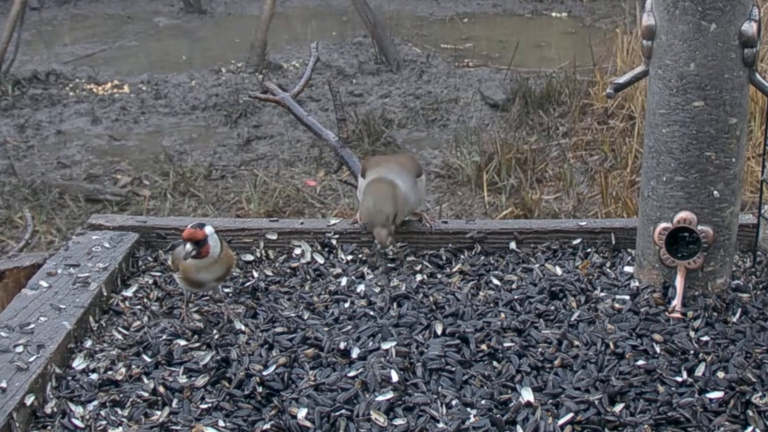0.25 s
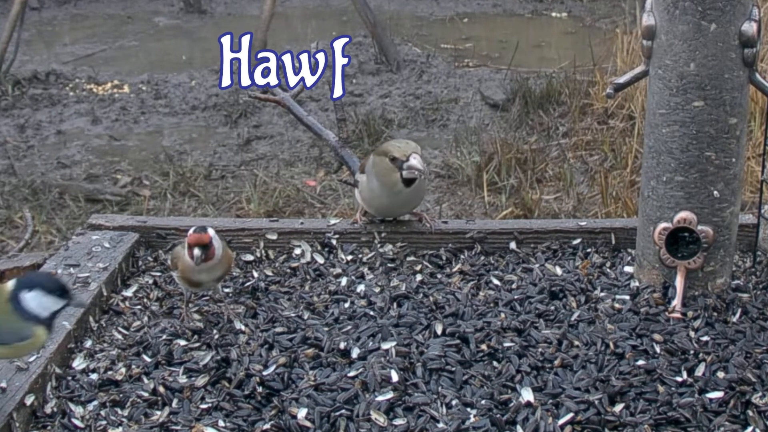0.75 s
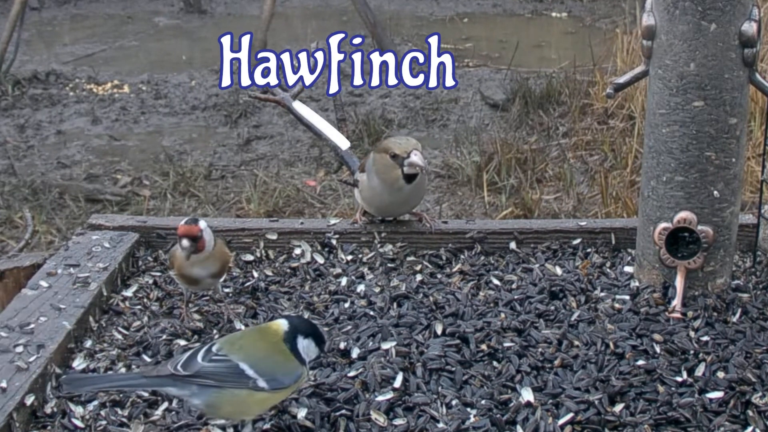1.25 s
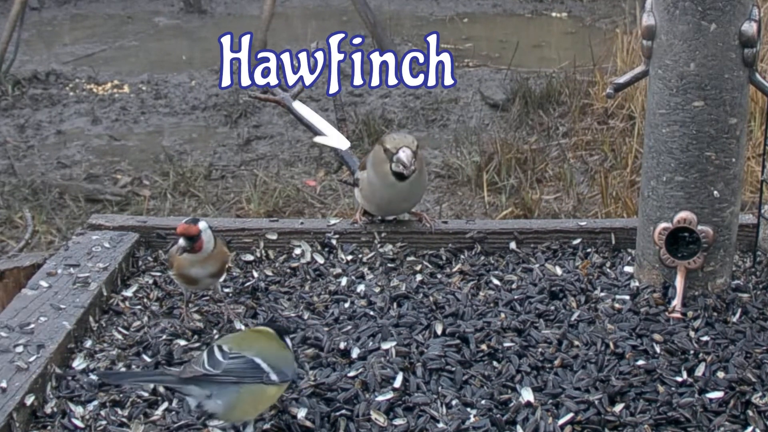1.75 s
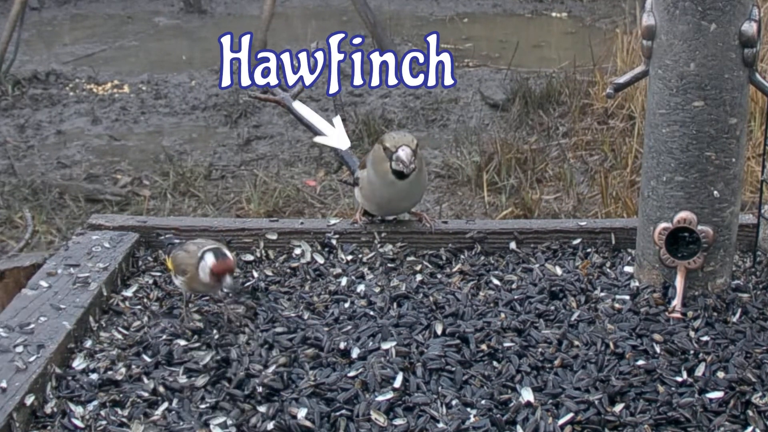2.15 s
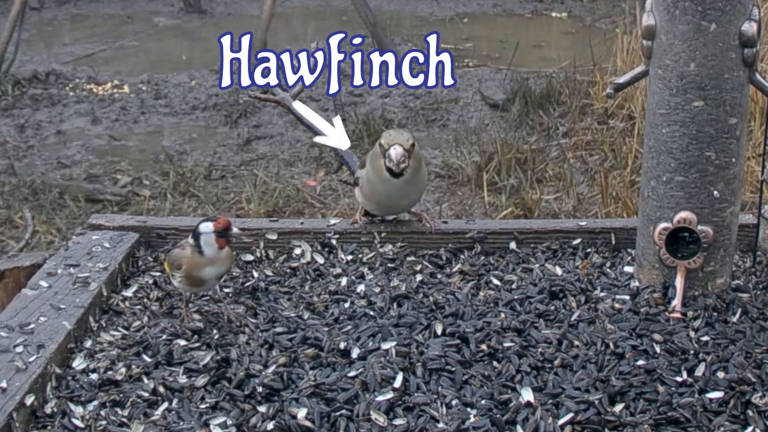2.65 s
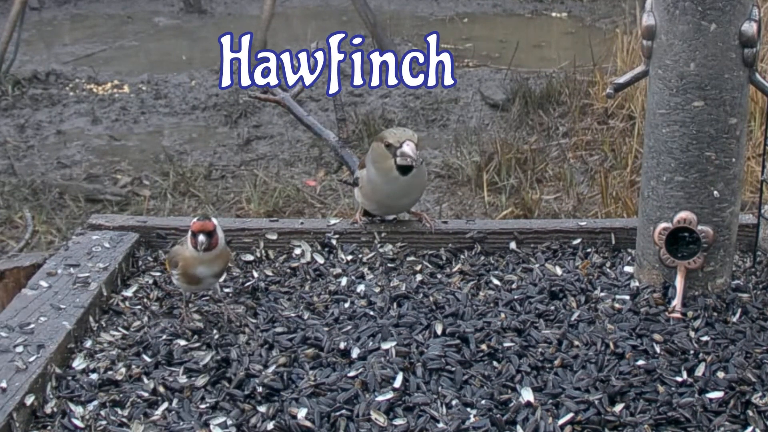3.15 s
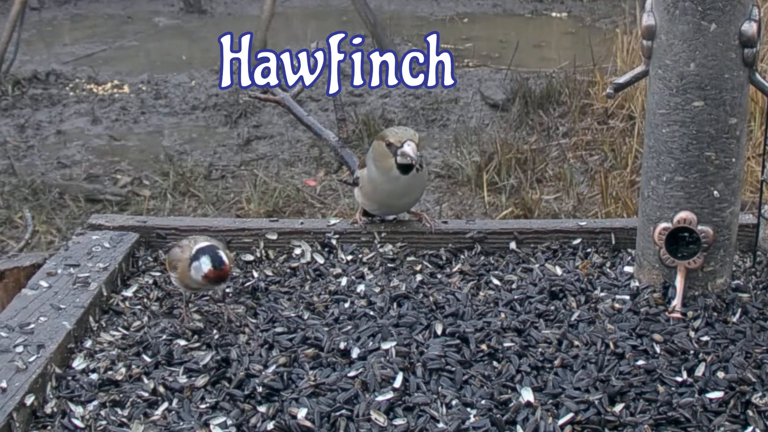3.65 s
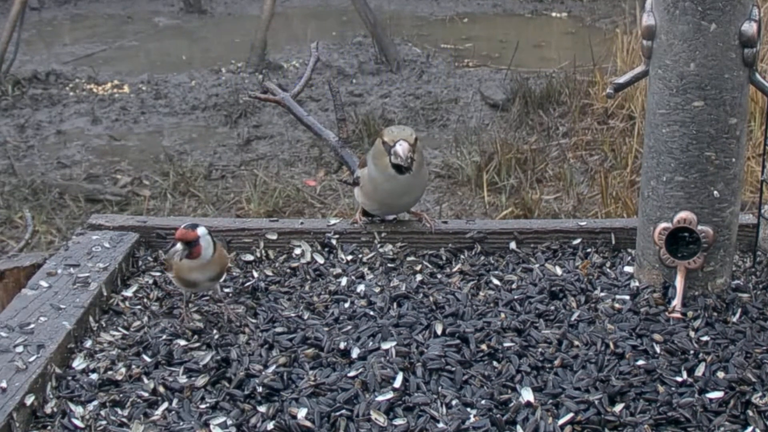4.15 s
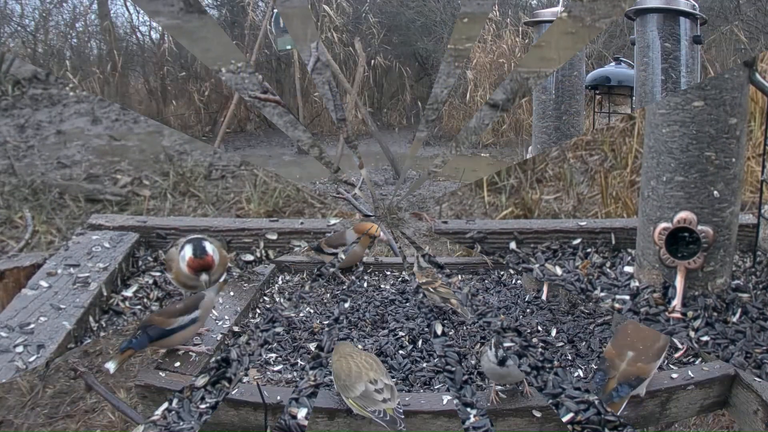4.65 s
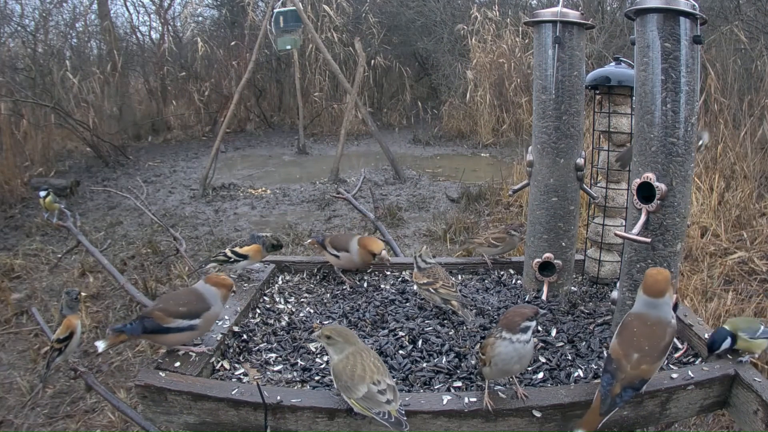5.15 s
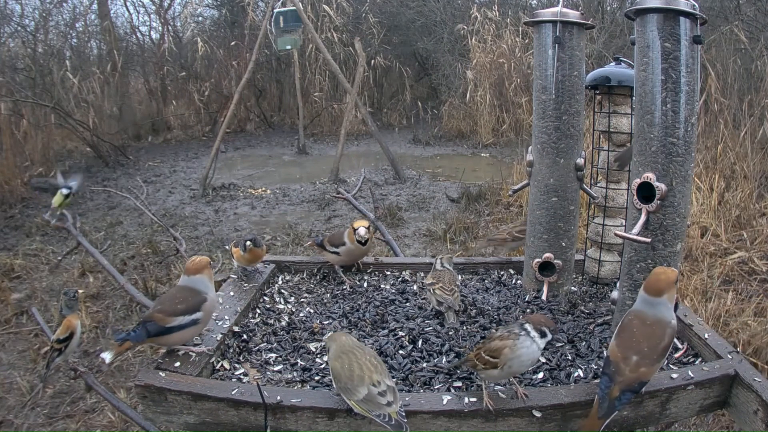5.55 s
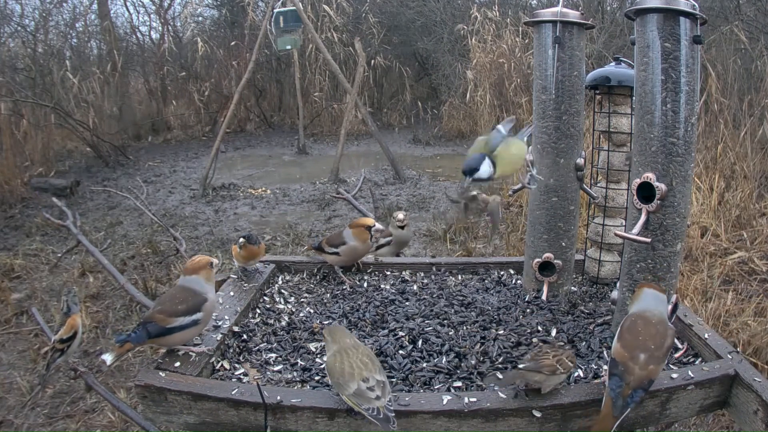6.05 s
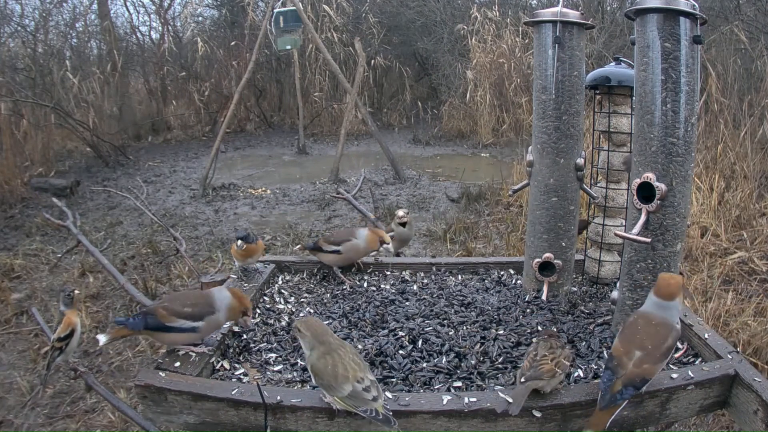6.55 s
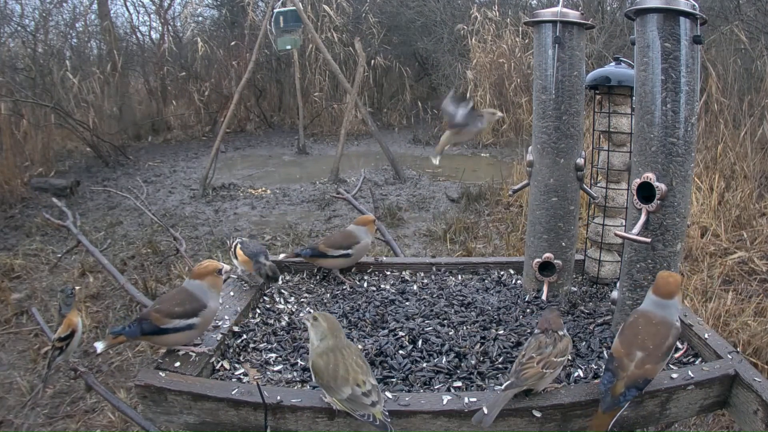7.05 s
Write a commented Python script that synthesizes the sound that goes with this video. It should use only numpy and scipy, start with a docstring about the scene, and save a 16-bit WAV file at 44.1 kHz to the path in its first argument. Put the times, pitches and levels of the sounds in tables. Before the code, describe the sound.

Small birds feed on a wooden seed tray outdoors, husks cracking sharply, with high chips, one harsh rasping call and faint far whistles over low rumble.

```python
"""Finches and tits feed on a wooden tray of seeds outdoors, heard by one microphone close by. Near birds give
sharp two-voiced chips and rasps, far ones faint whistles, all from gliding sines and noise. Noise bursts ring
as cracking, rustling husks and beaks knocking the tray; clicks ring the tray as feet land, and wings beating
over it push low puffs of air. Filtered noise makes the feather brushes, the low rumble, the far drone and the
hiss; sparse echoes surround it."""
import sys
import numpy as np
from scipy import signal
from scipy.fft import rfft, irfft
from scipy.io import wavfile
from scipy.ndimage import uniform_filter1d

SR = 44100
rng = np.random.default_rng(int(sys.argv[2]) if len(sys.argv) > 2 else 0)


def wrap_up_sound(samples):
    """Save the sound to the file named by the first command line argument, as 16-bit audio."""
    columns = np.atleast_2d(samples).T
    # keep every value between -1 and 1, then stretch to whole-number steps
    tamed = np.clip(columns, -1, 1)
    steps = np.round(tamed * 32767).astype(np.int16)
    wavfile.write(sys.argv[1], SR, steps)


def attenuation_scalar(level_db):
    """Turn a level in dB into a linear amplitude multiplier (20 dB per decade)."""
    decades = np.asarray(level_db, float) / 20
    return 10 ** decades


N = 321930


def on_curve(rows):
    """Columns of a time table, one value per sample."""
    s, *columns = np.transpose(rows)
    return [np.interp(np.arange(N) / SR, s, column) for column in columns]


def rms_one(x):
    """Scale to unit rms."""
    return x / np.sqrt(np.mean(x ** 2) + 1e-20)


def drift(rate):
    """Random wander of unit rms, with a new target rate times a second."""
    targets = rng.standard_normal(N // 40)
    return rms_one(np.interp(np.arange(N) * rate / SR, np.arange(N // 40), targets))


def cut(x, hz, kind, order):
    """Butterworth high- or low-pass."""
    return signal.sosfilt(signal.butter(order, hz, kind, fs=SR, output="sos"), x)


def band(x, low_hz, high_hz, top_order=2):
    """Keep what lies between two frequencies."""
    return cut(cut(x, low_hz, "high", order=2), high_hz, "low", order=top_order)


def ring(clicks, hz, t60):
    """A resonator: a unit click sets a dying sine of starting height 1 ringing."""
    r, w = attenuation_scalar(-60 / (t60 * SR)), 2 * np.pi * hz / SR
    return signal.lfilter([0, np.sin(w)], [1, -2 * r * np.cos(w), r * r], clicks + 1e-18)


# background levels before patchiness: (t/s, rumble level/dB, drone level/dB, hiss level/dB)
BACKGROUND_LEVELS = [(0.0, -47, -55.5, -53.5), (1.6, -46, -55, -52), (2.2, -46, -51.5, -51),
                     (2.6, -46.5, -55.5, -53), (3.45, -47, -53.5, -51.5), (4.4, -46, -54, -54),
                     (4.8, -42, -49.5, -46), (5.05, -42.5, -49, -52.5), (5.4, -42.5, -50, -50.5),
                     (6.9, -46, -51.5, -54), (7.3, -41.5, -49, -45)]
# spectral tilt of the background, relative within each zone: (f/Hz, density level/dB per Hz)
BACKGROUND_COLOUR = [(25, -43), (100, -2.5), (146, 1), (368, -8), (510, -20.5), (800, -16), (1000, -10.5),
                     (1200, -12), (1450, -17.5), (2530, -23), (2900, -16), (3320, -25.5), (6730, -14.5),
                     (15200, -40), (16500, -28)]
# where the deep yields to rumble, rumble to drone and drone to hiss: (f/Hz)
ZONE_EDGES = [110, 550, 2400]


def ground():
    """Coloured noise in four zones, each on its own level and gently patchy."""
    deep_db = -56.5   # the lowest zone has no level curve
    patchy_db, patch_rate = [.8, 1.5, 1.6, 1.0], [15, 22, 30, 20]   # dB rms, targets per second
    f = np.maximum(np.arange(N // 2 + 1) * SR / N, 1)
    hz, db = np.transpose(BACKGROUND_COLOUR)
    spectrum = rfft(rng.standard_normal(N)) * attenuation_scalar(np.interp(np.log(f), np.log(hz), db))
    zone = np.digitize(f, ZONE_EDGES)
    out = np.zeros(N)
    for k, level in enumerate([deep_db] + on_curve(BACKGROUND_LEVELS)):
        layer = rms_one(irfft(spectrum * (zone == k), N))
        out += attenuation_scalar(level + patchy_db[k] * drift(patch_rate[k])) * layer
    return out


def microphone_hiss():
    """Steady self-noise, high-passed into the top octave."""
    noise_db = -64   # before the high-pass
    return attenuation_scalar(noise_db) * cut(rng.standard_normal(N), 10500, "high", order=2)


def surroundings(x, t60, wet_db):
    """Scattered echoes from posts, ground and reeds: a sparse dying tail."""
    t = np.arange(int(.25 * SR)) / SR
    echoes = rng.standard_normal(len(t)) * (rng.random(len(t)) < .08)
    tail = echoes * attenuation_scalar(-60 * t / t60) * (t > .003)
    return attenuation_scalar(wet_db) * signal.fftconvolve(x, tail / np.sqrt(np.sum(tail ** 2)))[:N]


def rustle(per_s, gain_db):
    """Many small husks shift and snap at random, in clumps, each a short gritty burst ringing a few cycles."""
    sizes = attenuation_scalar(4.5 * np.minimum(rng.exponential(1, N), 2.2))
    clumps = attenuation_scalar(3 * drift(25))
    clicks = sizes * (rng.random(N) < per_s * clumps / SR)
    pitches, dealt = np.geomspace(2300, 12500, 10), rng.integers(0, 10, N)
    grit, fade = rng.standard_normal(N), np.exp(-1 / (0.0026 * SR))
    out = np.zeros(N)
    for k, hz in enumerate(pitches):
        burst = grit * signal.lfilter([1], [1, -fade], clicks * (dealt == k) + 1e-18)
        weight = attenuation_scalar(-10 * abs(np.log2(hz / 6800)))   # 10 dB less per octave from the favoured pitch
        out += weight * ring(burst, hz, 16.5 / hz)
    return attenuation_scalar(gain_db) * band(out, 2600, 10000)


# feathers brush the seeds: (start t/s, length t/s, level/dB at the height of the stroke)
FEATHER_BRUSHES = [(6.569, 0.034, -40.5), ]


def brushes():
    """A short soft swish: band-passed noise that swells and fades evenly."""
    t = np.arange(N) / SR
    stroke = np.zeros(N)
    for s, length, db in FEATHER_BRUSHES:
        stroke += attenuation_scalar(db) * np.interp(t, [s, s + .5 * length, s + length], [0, 1, 0])
    return stroke * rms_one(band(rng.standard_normal(N), 780, 2400))


# feet landing on the tray: (t/s, relative level/dB)
FOOT_LANDINGS = [(1.547, -34), (2.336, -25), (3.99, -36), (5.546, -32.5), (5.634, -32), (5.958, -32.5),
                 (6.1, -34)]
# wing flurries over the tray: (start t/s, relative level/dB, number of beats)
WING_FLURRIES = [(2.214, -29.5, 3), (2.917, -33, 10), (4.77, -27, 3)]
# resonances of the wooden tray: (f/Hz, relative level/dB, t60 t/s)
TRAY_MODES = [(163, 3.5, 0.13), (256, 13.5, 0.022), (427, 3, 0.006), (645, 8.5, 0.006), (1200, 4, 0.0088)]


def thumps():
    """Feet land with soft blows 4.61 ms after first touch and ring the tray modes; wing beats give low puffs of
    air, with the upper modes held back. Strengths change each time."""
    beat_s, scatter_s = .032, .004
    blows = list(FOOT_LANDINGS)
    for s, db, beats in WING_FLURRIES:
        blows += [(s + k * beat_s + rng.normal(0, scatter_s), db) for k in range(beats)]
    blows = np.array(blows)
    at, out = ((blows[:, 0] + 0.00461) * SR).astype(int), np.zeros(N)
    soft_db = 5.9 * (np.arange(len(at)) >= len(FOOT_LANDINGS))   # feathers stir the upper modes less
    luck_db = rng.normal(0, 1.2, (len(at), len(TRAY_MODES)))
    for k, (hz, db, t60) in enumerate(TRAY_MODES):
        clicks = np.zeros(N)
        clicks[at] = -attenuation_scalar(blows[:, 1] + db - 8 + luck_db[:, k] - k * soft_db)
        out += ring(clicks, hz, t60)
    return band(out, 156, 2100)


# husks cracking in beaks and beaks knocking the tray: (t/s, peak level/dB, ring f/Hz)
CRACKS_AND_KNOCKS = [(1.403, -22.5, 2000), (1.404, -24, 4360), (1.4098, -25, 6630), (1.7418, -28.5, 4860),
                     (2.2427, -28, 6800), (2.3385, -12.5, 5900), (2.339, -13, 13300), (2.63, -26.5, 4730),
                     (2.662, -27.5, 2170), (3.574, -29, 6600), (4.3393, -27, 6690.0), (4.4957, -25.5, 7360),
                     (4.909, -20.5, 3580), (4.9117, -21.5, 6400), (4.951, -27.5, 5870), (5.6276, -20.5, 6940.0),
                     (5.885, -28, 7040), (6.2324, -28.5, 6300), (6.4558, -16, 6300), (6.5294, -27, 6560),
                     (6.608, -11.5, 5800), (6.811, -21.5, 9100), (6.997, -23.5, 5700), (7.2088, -23, 7150.0),
                     (7.2306, -12, 6900)]
# resonances all cracks and knocks share: (f/Hz, mean relative level/dB, t60 t/s)
CRACK_MODES = [(5100, -10, .003), (7000, -4.5, .004), (8500, -12, .003), (14500, -15, .002)]


def cracks_and_knocks():
    """Each crack or knock is a brief noise burst that rings at its own pitch and shares the common modes."""
    out, t = np.zeros(N), np.arange(700) / SR
    for s, db, hz in CRACKS_AND_KNOCKS:
        burst = rng.standard_normal(len(t)) * attenuation_scalar(-60 * t / 0.0075) * np.minimum(t / 0.00012, 1)
        sound = ring(burst, hz, min(15 / hz, .0035))
        for mode_hz, mode_db, t60 in CRACK_MODES:
            sound = sound + attenuation_scalar(mode_db + rng.normal(0, 1.34)) * ring(burst, mode_hz, t60)
        sound = cut(sound, min(0.92 * hz, 4900), "high", order=4)   # keep the bass out
        sound = cut(sound, max(9000, 0.94 * hz), "low", order=2)
        i = int(s * SR)
        out[i:i + len(t)] += attenuation_scalar(db) * sound / np.abs(sound).max()
    return out


# voice quality by the time of the call, with a second voice just above the first that beats with it:
# (t/s, second voice share 0-1, gap f/Hz, air noise level/dB before filtering, unsteadiness as a factor)
VOICE_QUALITY = [(5.3, .04, 400, -36, 1), (5.5, .15, 550, -21, 1.5), (6.65, .5, 420, -34, 1.3),
                 (7.0, .1, 450, -34, 1.2)]


def whistle(add, s, hz, height, octave_db, flutter):
    """A gliding sine with a second voice, a faint octave, air noise and an unsteady membrane."""
    i = np.arange(int(s[0] * SR), int(s[-1] * SR))
    phase = 2 * np.pi * np.cumsum(np.interp(i / SR, s, hz)) / SR
    when, *quality = np.transpose(VOICE_QUALITY)
    share, gap_hz, air_db, unsteady = [np.interp(s[0], when, q) for q in quality]
    noise = rng.standard_normal((3, 6000))
    smooth = uniform_filter1d(uniform_filter1d(noise[:2], size=30), size=30)
    shake = unsteady * flutter * smooth[:, :len(i)]
    first = np.sin(phase + shake[1])
    upper = share * np.sin(phase + 2 * np.pi * gap_hz * (i / SR - s[0]) + 4 * shake[0])
    octave = attenuation_scalar(octave_db) * np.sin(2 * phase + 5 * shake[1] + 8 * shake[0])
    air = attenuation_scalar(air_db) * band(noise[2], 6500, 9700)[:len(i)]
    add[i] += np.interp(i / SR, s, height) * (1 + shake[0]) * (first + upper + octave + air)


# one far bird repeats a down-slurred note: (start t/s, first f/Hz, first-voice peak level/dB)
SLURRED_NOTES = [(0.385, 2870, -40.5), (1.842, 2860, -42.5), (2.549, 3230, -37), (3.004, 2650, -44),
                 (3.64, 3250, -42.5), (4.325, 3120, -41)]
# other far whistles: (start t/s, length t/s, first f/Hz, last f/Hz, first-voice peak level/dB)
OTHER_WHISTLES = [(0.529, 0.024, 3120, 2850, -37), (0.545, 0.013, 2920, 3500, -35),
                  (0.556, 0.014, 3520, 2850, -40), (0.742, 0.023, 6240, 7400, -44),
                  (0.765, 0.02, 7520, 7550, -42), (0.912, 0.023, 3600, 4060, -45.5),
                  (1.095, .025, 4200, 4130, -51), (1.222, 0.115, 3400, 3680, -53),
                  (1.328, 0.027, 3720, 3960, -50), (3.402, 0.014, 7000, 7000, -41),
                  (3.944, 0.026, 3540, 4060, -45.5), (4.695, 0.035, 3800, 4120, -50),
                  (4.839, 0.052, 7170, 8060, -42.5), (4.974, 0.027, 7300, 6870, -39),
                  (5.007, 0.014, 7660, 7800, -45), (5.739, 0.052, 6970, 6730, -37.5),
                  (5.827, 0.052, 6720, 7040, -47)]


def far_birds():
    """Whistled glides that flatten out while the level swells, sags and fades."""
    slur_end_hz, slur_hz_per_s = 2380, 24000   # the mean fall sets each slur's length
    out, shape = np.zeros(N), np.array([0, .15, .6, 1])
    slurs = [(s, (hz - slur_end_hz) / slur_hz_per_s, hz, slur_end_hz, db) for s, hz, db in SLURRED_NOTES]
    for start, length, first_hz, last_hz, db in slurs + list(OTHER_WHISTLES):
        glide = first_hz + (1 - (1 - shape) ** 1.49) * (last_hz - first_hz)
        height = attenuation_scalar(db) * np.array([0, 1, .6, 0])
        whistle(out, start + length * shape, glide, height, octave_db=-28, flutter=.9)
    return out


# a harsh caller's breath rasps around its strokes: (start t/s, length t/s, level/dB before chopping)
BREATH_RASPS = [(5.555, 0.07, -46), (5.638, .07, -39)]


def rasp():
    """Turbulent air in the throat, chopped unevenly, swelling and fading with the call."""
    t = np.arange(N) / SR
    effort = np.zeros(N)
    for s, length, db in BREATH_RASPS:
        corners = [s, s + 0.032 * length, s + 0.94 * length, s + length]
        effort += attenuation_scalar(db) * np.interp(t, corners, [0, 1, 1, 0])
    air = band(rng.standard_normal(N), 4200, 8800, top_order=4)
    return effort * attenuation_scalar(3.4 * drift(300)) * rms_one(air)


# near chips, one row per whistled stroke; strokes overlap where both sides of the syrinx sound:
# (start t/s, length t/s, first f/Hz, middle f/Hz, last f/Hz, first-voice peak level/dB)
CHIP_STROKES = [(1.034, 0.029, 7170, 8160, 8500, -32), (1.044, 0.044, 8510, 8550, 7900, -27.5),
                (1.572, 0.024, 4700, 7100, 8300, -22.5), (1.581, 0.028, 8480, 8435, 8140, -11.5),
                (2.986, 0.011, 5200, 6850, 7750, -24), (2.99, 0.044, 7730, 7800, 7700, -33),
                (5.556, .02, 5700, 6200, 7100, -35), (5.569, .0105, 4650, 4900, 4850, -14),
                (5.576, 0.015, 5100, 5800, 4700, -25), (5.578, 0.012, 4000, 3650, 4200, -16.5),
                (5.5905, .009, 3900, 3700, 3000, -19), (5.602, .008, 3100, 3350, 3600, -25),
                (5.6085, .012, 4050, 3600, 2600, -21.5), (5.648, .0135, 4350, 4850, 5200, -6),
                (5.6605, .0055, 5400, 6150, 5500, -9.5), (5.6648, .005, 5250, 4650, 4000, -5),
                (5.67, 0.0045, 4900, 4500, 3900, -14), (5.679, .0035, 4400, 4750, 4700, -3),
                (5.6815, .004, 4600, 4450, 4300, -8), (5.684, 0.0055, 3900, 3300, 2900, -23),
                (5.6845, .006, 7300, 5600, 4400, -17), (5.69, 0.005, 4300, 4650, 5200, -13),
                (5.692, 0.011, 2650, 2750, 2900, -28), (6.477, .02, 7550, 9200, 8100, -22.5),
                (6.481, 0.014, 7850, 7400, 4180, -30.5), (6.59, 0.016, 7900, 9000, 8200, -11),
                (6.6225, 0.0115, 7450, 6800, 6000, -10), (6.633, 0.008, 6300, 7250, 7200, -8),
                (6.637, 0.0145, 6250, 6300, 5900, -8), (7.086, 0.049, 7300, 7420, 8580, -11.5),
                (7.093, 0.044, 7950, 8260, 8930, -19.5), (7.132, 0.024, 8800, 8100, 7300, -20.5),
                (7.132, .025, 7700, 7130, 6480, -10.5)]


def near_birds():
    """Strokes bend smoothly through three pitches; arches and steep falls peak early, the rest swell late."""
    early_peak, late_peak = 0.3, 0.82   # share of the length at which a stroke is loudest
    steep_fall = .9   # last pitch over first below which a stroke counts as falling
    swell_power, fade_power = 1.14, 0.48   # curve of the growth and of the dying away
    out, share = np.zeros(N), np.linspace(0, 1, num=25)
    for start, length, first_hz, middle_hz, last_hz, db in CHIP_STROKES:
        bend = np.polyfit([0, .5, 1], [first_hz, middle_hz, last_hz], 2)
        hz = np.polyval(bend, share)
        early = middle_hz > max(first_hz, last_hz) or last_hz < steep_fall * first_hz
        peak = early_peak if early else late_peak
        swell = (share / peak) ** swell_power
        fade = ((1 - share) / (1 - peak)) ** fade_power
        height = attenuation_scalar(db) * np.minimum(swell, fade)
        whistle(out, start + length * share, hz, height, octave_db=-37, flutter=.5)
    return out


def scene():
    """All sources reach one microphone."""
    near, far, sharp = near_birds() + rasp(), far_birds(), cracks_and_knocks()
    near_echoes = surroundings(near + attenuation_scalar(-7) * sharp, t60=.085, wet_db=-17)
    far_echoes = surroundings(far, t60=.18, wet_db=-7)
    birds = near + far + near_echoes + far_echoes
    feeding = sharp + rustle(per_s=300, gain_db=-57) + thumps() + brushes()
    mono = birds + feeding + ground() + microphone_hiss()
    return np.array([mono, mono])


def roll_off(x):
    """The treble ends steeply here."""
    return signal.sosfilt(signal.butter(12, 16850, fs=SR, output="sos"), x)


def record(dry):
    """A steep low-pass removes the top of the spectrum."""
    low_pass = signal.cheby2(10, 40, 16350, fs=SR, output="sos")   # 40 dB down from 16350 Hz
    mix = signal.sosfilt(low_pass, dry)
    return roll_off(mix)


dry = scene()
out = record(dry)
wrap_up_sound(out)
```